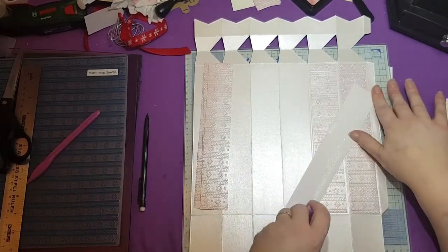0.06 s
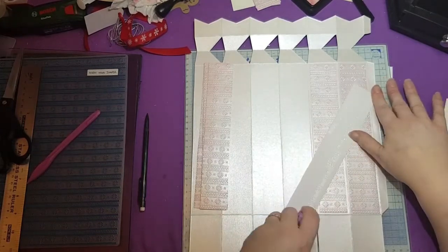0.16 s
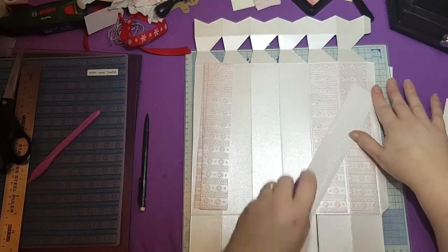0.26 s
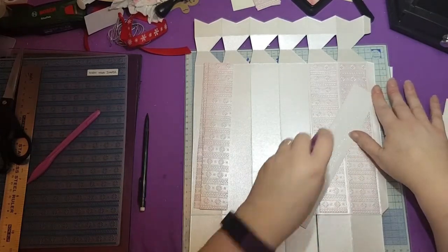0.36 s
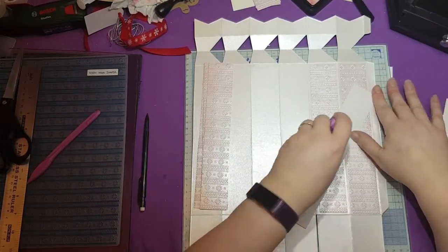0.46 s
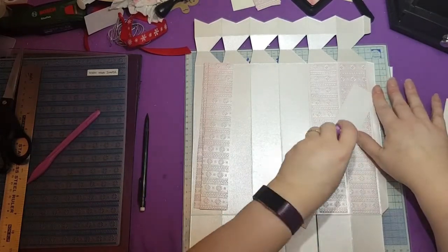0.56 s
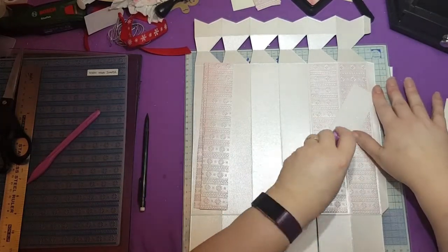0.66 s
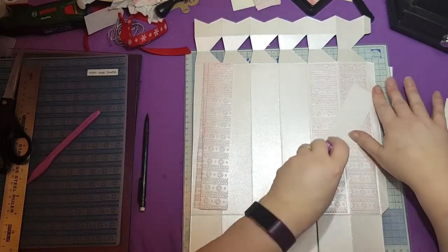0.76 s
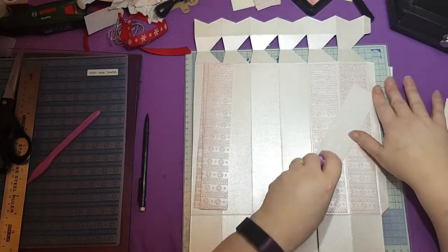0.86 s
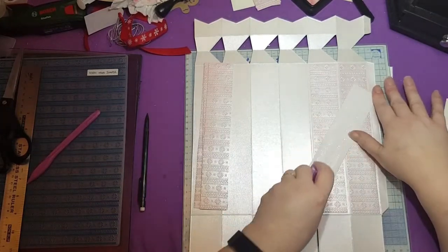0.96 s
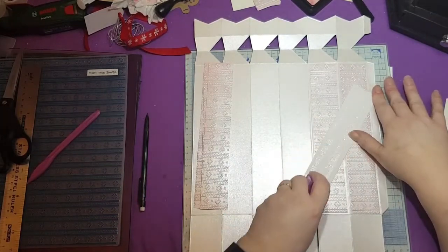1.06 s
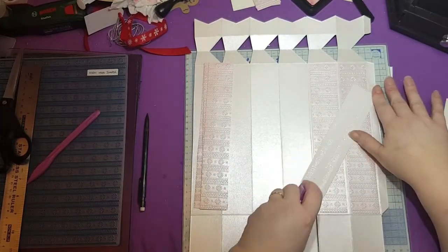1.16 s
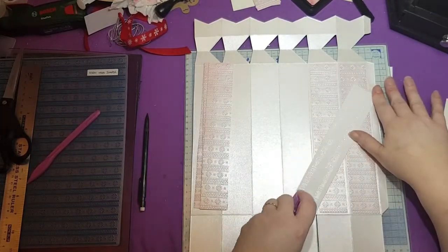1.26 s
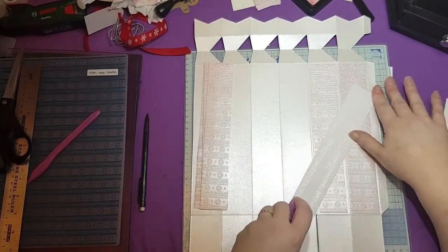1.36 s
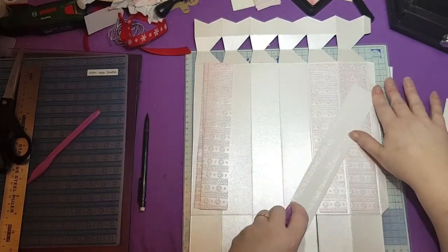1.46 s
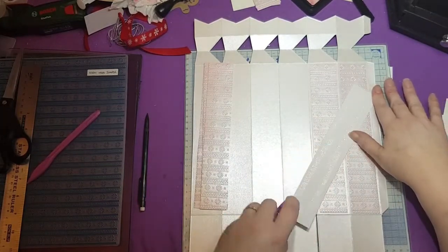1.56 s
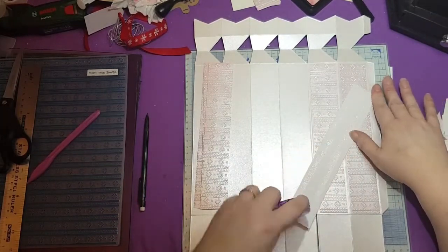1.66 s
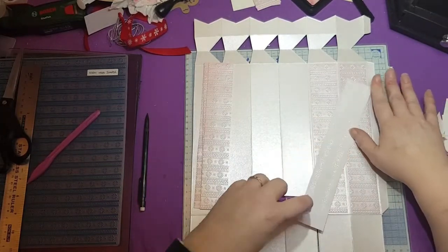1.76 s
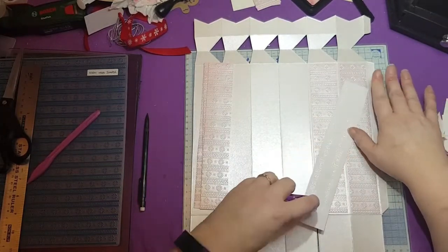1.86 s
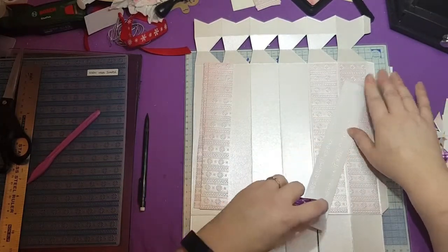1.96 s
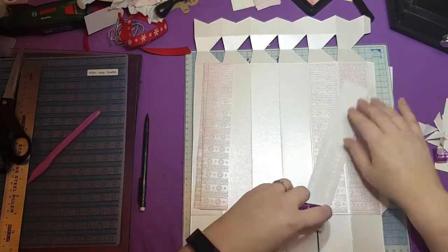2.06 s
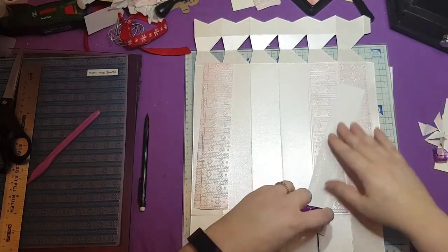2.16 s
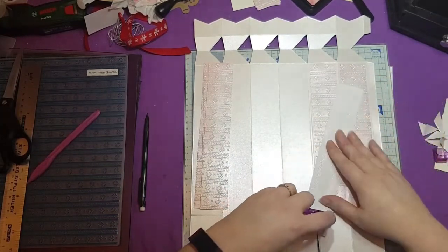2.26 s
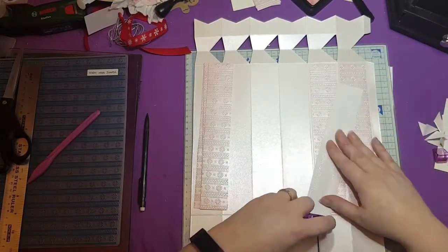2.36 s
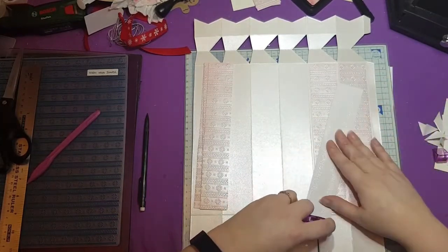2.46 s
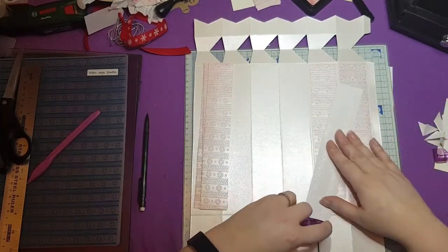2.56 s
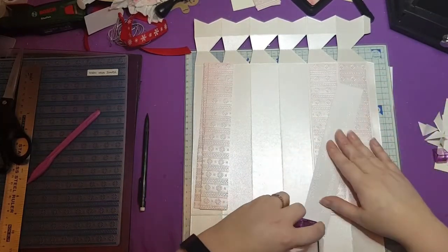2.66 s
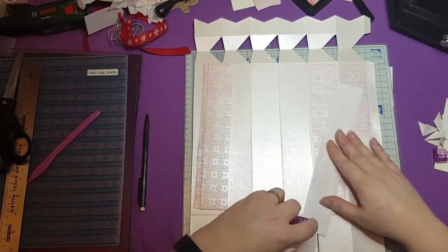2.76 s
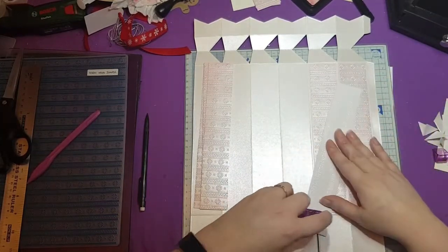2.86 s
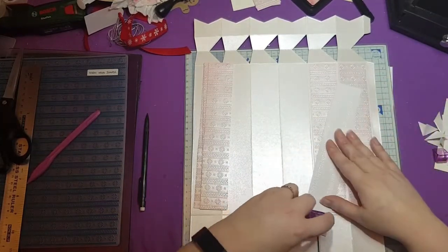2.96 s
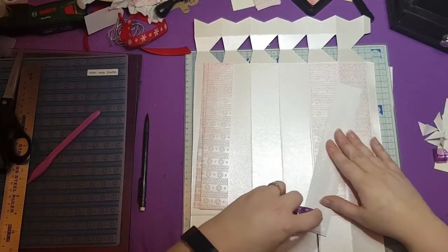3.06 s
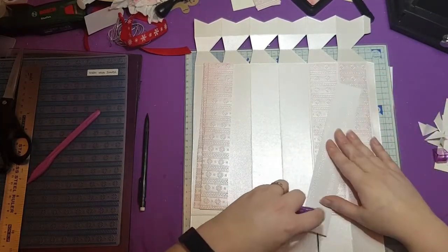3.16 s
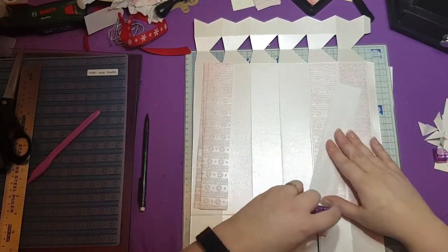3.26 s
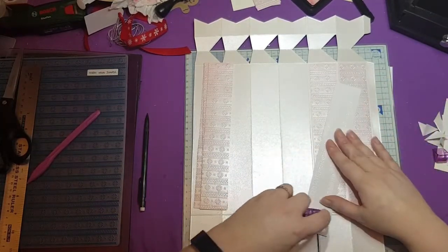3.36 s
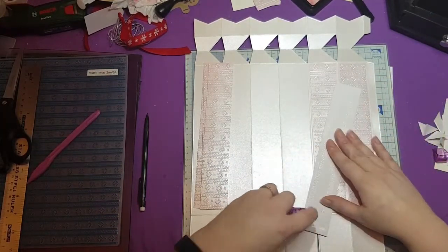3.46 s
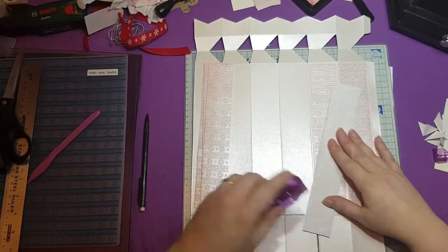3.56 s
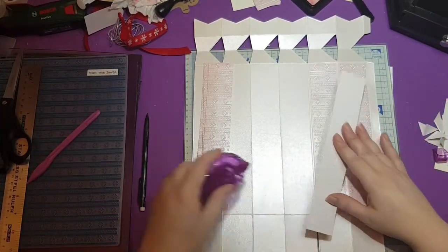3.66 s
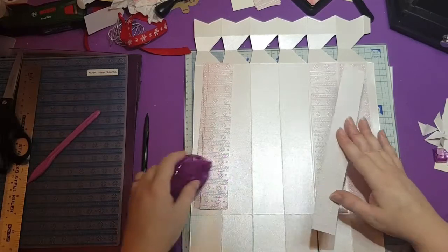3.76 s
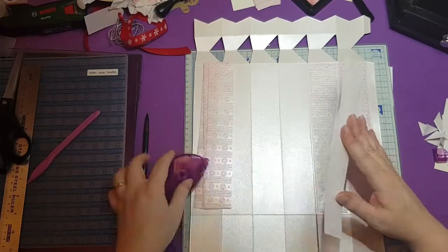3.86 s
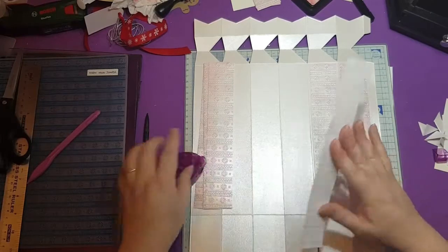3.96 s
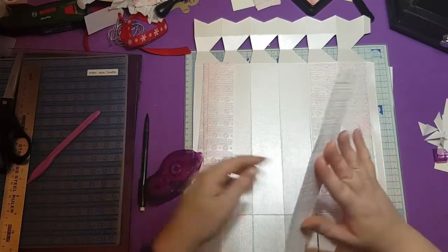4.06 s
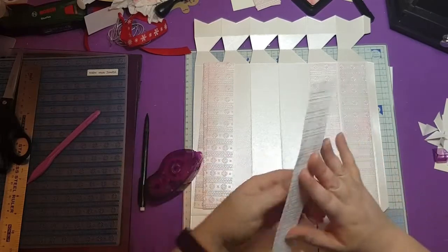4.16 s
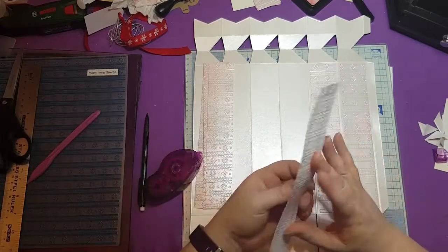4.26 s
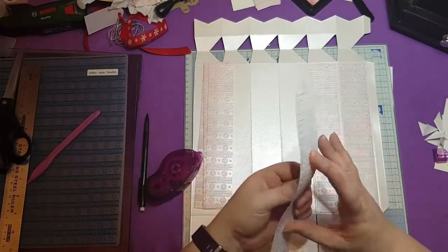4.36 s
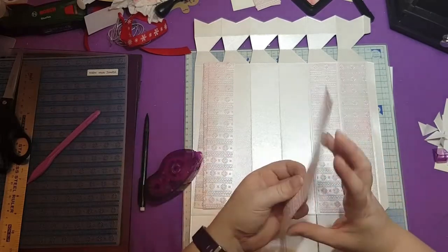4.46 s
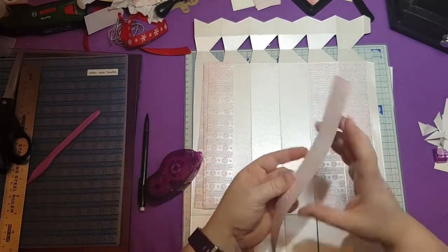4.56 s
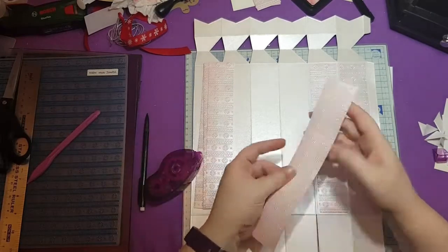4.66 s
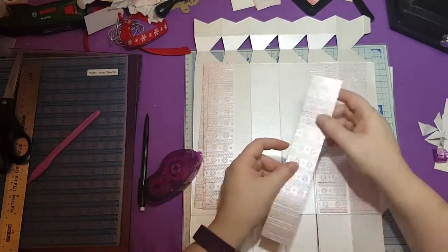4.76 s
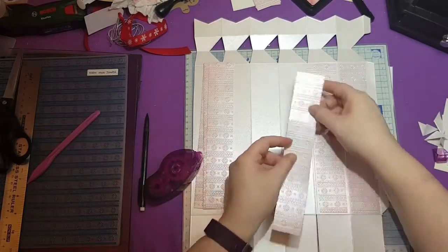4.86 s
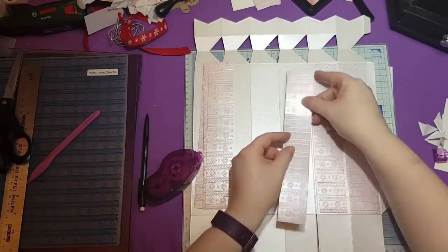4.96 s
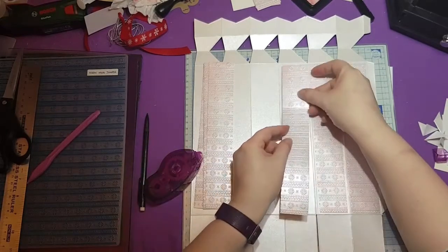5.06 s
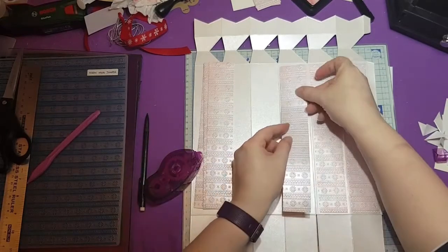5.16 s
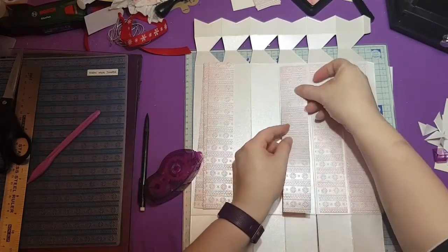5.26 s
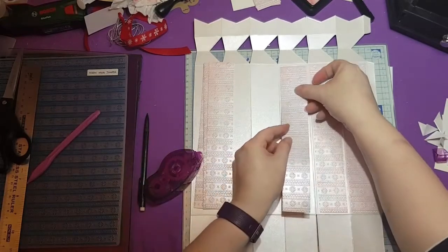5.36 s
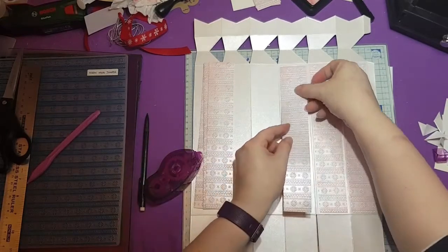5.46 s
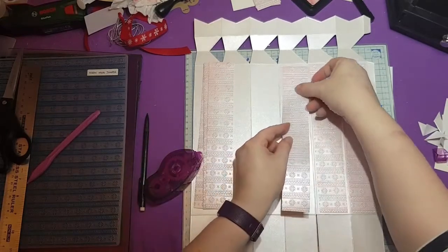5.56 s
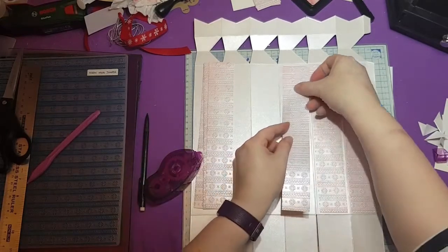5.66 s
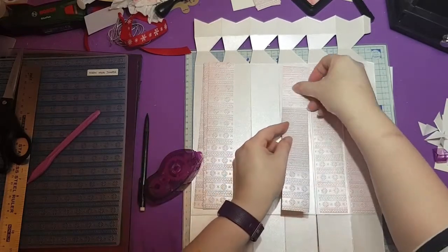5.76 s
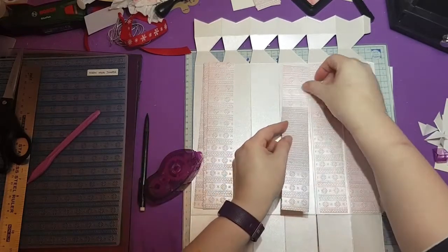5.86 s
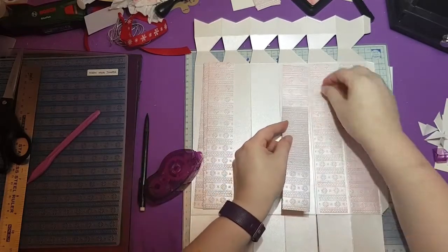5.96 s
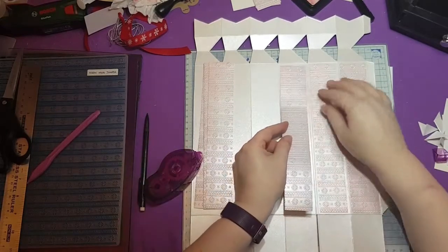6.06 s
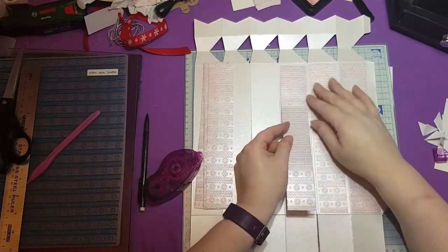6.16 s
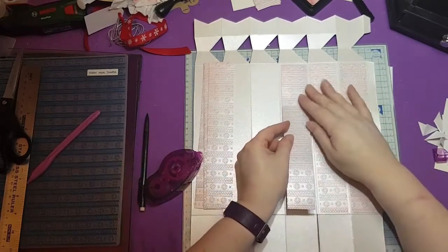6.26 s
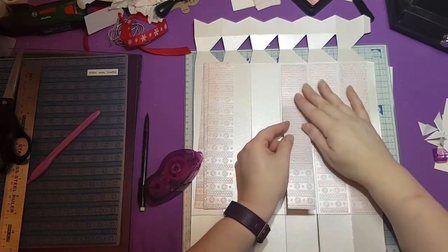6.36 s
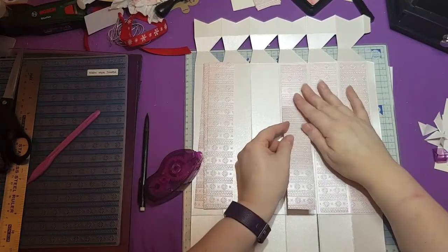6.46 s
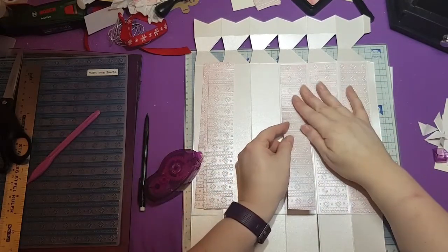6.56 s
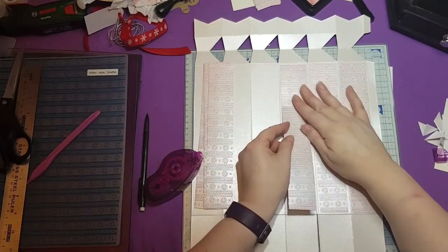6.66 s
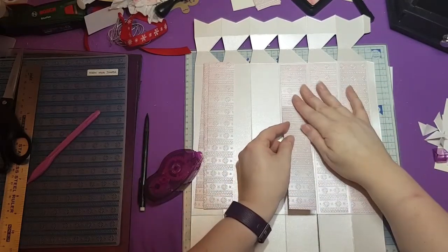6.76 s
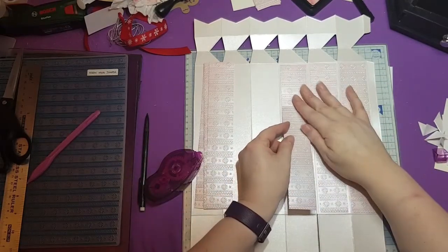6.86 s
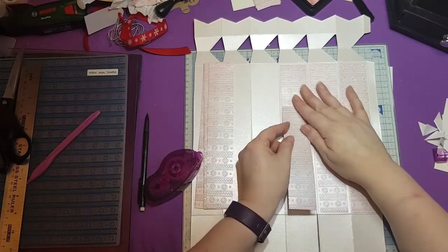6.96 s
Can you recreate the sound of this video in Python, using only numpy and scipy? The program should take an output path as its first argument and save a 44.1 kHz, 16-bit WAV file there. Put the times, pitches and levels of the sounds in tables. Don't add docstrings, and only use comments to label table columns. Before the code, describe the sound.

A plastic tape runner rasps and squeaks in short strokes along card, clacks down on the desk, then a stiff strip snaps and rustles.

```python
import sys
import numpy as np
from scipy import signal
from scipy.fft import rfft, irfft, next_fast_len
from scipy.io import wavfile
from scipy.ndimage import uniform_filter1d, map_coordinates

SR = 44100
rng = np.random.default_rng(int(sys.argv[2]) if len(sys.argv) > 2 else 0)


def gain_from_decibels(decibels):
    exponent = np.asarray(decibels, float) / 20
    return 10 ** exponent


def transcribe(signal):
    frames = np.atleast_2d(signal).T
    limited = np.clip(frames, -1, 1)
    pcm = np.round(limited * 32767).astype(np.int16)
    wavfile.write(sys.argv[1], SR, pcm)


N = 309133
HIT = 4096
TAIL = 20480
PAN_DB = 3.5


# [t/s, length/s, effort level/dB, squeal rel level/dB, hollow rel level/dB]
PUSHES = [(-0.02, 0.086, -53, -1, -6.5), (0.105, .05, -64, -1, -20), (0.17, .045, -65, -10, -14.5),
          (0.748, .03, -62, -9, -4), (0.778, 0.088, -52.5, -2.5, -10.5), (0.891, 0.044, -50, -2, -6.5),
          (0.972, 0.065, -55.5, 0, -8), (1.075, .11, -60, 2, -19.5), (1.224, 0.012, -52, 6.5, -33),
          (1.26, 0.041, -58, -3, -18), (1.336, .07, -65, -4, -10), (1.391, 0.11, -61.5, 5, -25),
          (1.475, 0.11, -66, -5, -14), (2.297, 0.041, -62, -12, -12), (2.338, 0.053, -69, -13, -6),
          (2.438, 0.046, -71.5, -2, -14), (2.725, 0.086, -63.5, -10, -14), (2.812, 0.041, -61, -21, -26),
          (3.11, 0.051, -63.5, -10, -5.5), (3.2, 0.041, -64.5, -15, -9), (3.27, 0.045, -59.5, -21, -22)]
PUSH_RISE_S, PUSH_SAG_DB_PER_S, PUSH_FALL_S = 0.035, 29, 0.076


def effort():
    rows = [(s, PUSH_RISE_S, hold, PUSH_FALL_S, *rest) for s, hold, *rest in PUSHES]
    return swells(rows, PUSH_SAG_DB_PER_S)


# [t/s, f/Hz]
GRIP = [(0, 2425), (.15, 2310), (.8, 2280), (1.03, 2337), (1.3, 2300), (1.48, 2395), (2.4, 2490),
        (2.75, 2410), (3.2, 2510)]
FLUTTER_HZ, UPPER_HZ, UPPER_WANDER_HZ = 45, 3900, 120


def ring_pitches():
    grip_hz = np.interp(np.arange(N) / SR, *np.transpose(GRIP))
    lower_hz = grip_hz + FLUTTER_HZ * wander(30)
    upper_hz = UPPER_HZ + UPPER_WANDER_HZ * wander(8)
    return lower_hz, upper_hz


# [f/Hz, width/Hz, level/dB]
SHELL_BODY = [(922, 150, 5), (1295, 680, -4)]
# [f/Hz, width/Hz, level/dB]
GRATING = [(1590, 2100, -13.5), (2920, 880, -3), (4520, 1110, 4), (6180, 570, 3.5), (7220, 1400, 0),
           (11470, 1800, -1.5), (13800, 1300, -3)]
RING_WIDTHS = (93, 310)
UPPER_DB, FLUTTER_DB = -3.5, 2.5


def strokes(lower_hz, upper_hz):
    push, squeal_db, hollow_db = effort()
    force = grit(spread_db=2.0, clump_db=4.0, rate=170)
    squeal = gain_from_decibels(squeal_db - 1.5 + FLUTTER_DB * wander(39.87)) * follow(force, lower_hz, RING_WIDTHS[0])
    upper_ring = gain_from_decibels(UPPER_DB - 13.5) * follow(force, upper_hz, RING_WIDTHS[1])
    hollow = gain_from_decibels(hollow_db - 4) * unit(resonate(force, SHELL_BODY))
    grate = gain_from_decibels(-0.5) * unit(resonate(force, GRATING))
    return place(push * (squeal + upper_ring + hollow + grate), PAN_DB, lead=6)


# [t/s, crack peak level/dB, body rel level/dB, rings rel level/dB]
TICKS = [(0.1823, -49, -12, -7), (0.7783, -47.5, -19, -15), (1.0465, -38, -21, -6),
         (1.2202, -40.5, -34, -17), (1.4135, -55, -36, 4.5), (2.111, -62, 0.5, -22),
         (2.2945, -44.5, -10.5, -10.5), (2.3378, -35, -8, -11.5), (2.344, -45, 1.5, -21),
         (2.4404, -57, -6, 1), (2.6929, -48, -17, -17), (2.7236, -42, -28, -8.5), (2.7702, -50.5, -1, 3.5),
         (2.8137, -50, -6.5, 6.5), (3.1892, -44, -31, 0), (3.194, -45, -31, -13), (3.302, -45, -31, -14),
         (3.535, -53.5, -13, -8.5)]
STAMPS = [
    (3.0558, -28, -17.5, -17.5),
    (3.387, -22, -11.5, -18.5),
]
TICK_S, TICK_UPPER_DB, TICK_ROOM_DB = 0.011, 7, -1.5


def ticks(lower_hz, upper_hz):
    out = np.zeros((2, N))
    for s, db, body_db, ring_db in TICKS + STAMPS:
        i = round(s * SR)
        lower = [(lower_hz[i], RING_WIDTHS[0], 0)]
        upper = [(upper_hz[i], RING_WIDTHS[1], 0)]
        zones = ((0, GRATING), (body_db, SHELL_BODY), (ring_db, lower), (ring_db + TICK_UPPER_DB, upper))
        add(out, s, knock(db, zones, TICK_S))
    direct, spread = out
    return place(np.array([direct, gain_from_decibels(TICK_ROOM_DB) * spread]), PAN_DB, lead=6)


# [t/s, peak level/dB, f/Hz]
CRACKS = [(0.0611, -33.5, 5700), (0.238, -51, 6000), (0.8903, -29, 11000), (0.9887, -29, 11500),
          (1.008, -30, 9600), (1.0185, -39, 9000), (1.213, -41, 10500), (1.2185, -31.5, 7460),
          (1.279, -39.5, 9000), (1.36, -47, 8200), (1.4822, -33.5, 8800), (2.1674, -42.5, 13000),
          (2.7268, -29, 7540), (2.74, -45, 8000), (2.815, -34, 11000), (3.175, -40, 7500),
          (3.271, -48, 8000), (3.2768, -31.5, 7150), (3.4771, -35.5, 9200)]
CRACK_S, CRACK_WIDTH, CRACK_GRATE_DB, CRACK_ROOM_DB = 0.0038, 0.43, -11.5, -3


def cracks():
    out = np.zeros((2, N))
    for s, db, hz in CRACKS:
        zones = ((0, [(hz, CRACK_WIDTH * hz, 0)]), (CRACK_GRATE_DB, GRATING))
        add(out, s, knock(db, zones, CRACK_S))
    direct, spread = out
    return place(np.array([direct, gain_from_decibels(CRACK_ROOM_DB) * spread]), PAN_DB, lead=6)


# [t/s, peak level/dB, low rel level/dB, contact/s, pan/dB]
CLACKS = [
    (3.8776, -27, -16.5, 0.015, 2),
    (4.0053, -5.5, -8, 0.0025, 1),
]
ROCK = [
    (3.9583, -11.5, -9.5, 0.0021, 2.86),
]
# [f/Hz, width/Hz, level/dB]
CLACK_LOW = [(574, 78, -6), (728.5, 26, -0.5), (870, 67, -9), (1082.6, 51, -3.5), (1220, 100, -4),
             (1800, 57, -6.5)]
CLACK_MID = [(2540, 400, -3), (2610, 160, 2), (2910, 140, -4.5), (3780, 77, -4), (3820, 760, -2.5),
             (4200, 330, 0)]
CLACK_TOP = [(5500, 470, -5), (6450, 140, -2), (7300, 620, -7), (7700, 820, -3.5), (9900, 830, -12.5),
             (12900, 2100, -16.5)]
EDGE = [(2380, 150, -7.5), (3099, 120, -11), (3450, 86, -11), (3900, 80, 1.5), (4620, 220, -13)]
CLACK_TOP_DB = -6


def clacks():
    out = np.zeros((2, 2, N))
    for rows, modes in ((CLACKS, CLACK_MID), (ROCK, EDGE)):
        for s, db, low_db, contact, pan_db in rows:
            zones = ((0, modes), (low_db + 1, CLACK_LOW), (CLACK_TOP_DB, CLACK_TOP))
            add(out, s + 0.00082, place(knock(db + 0.1, zones, contact), pan_db, lead=0))
    return out


# [t/s, peak level/dB, f/Hz, flap rel level/dB, bright rel level/dB]
SNAPS = [(0.6143, -49.5, 3800, -6, -14), (1.836, -45, 4000, -27, -7.5), (1.8557, -47.5, 3960, -20, -9),
         (3.58, -52, 5770, -28, -10), (3.724, -42.5, 3350, -45, -0.5), (4.3487, -19.5, 2970, -23, -44),
         (4.355, -42, 3938, -31.5, -16), (4.5443, -22, 2860, -41, -26), (4.548, -25.5, 2350, -35, -8.5),
         (4.5693, -31.5, 2280, -32, -19), (4.6583, -32.5, 2660, -29, -8.5), (5.0642, -45, 2770, -18, -27),
         (5.218, -46, 4360, -19.5, -23.5), (5.627, -49.5, 4000, -29.5, -13),
         (5.7744, -53.5, 4160, -8.5, -13), (5.8285, -41.5, 4300, -20, -21),
         (5.8457, -29.5, 2630, -25.5, -36), (5.8474, -34.5, 1650, -34, -34), (5.8518, -42, 4400, -15, -20)]
# [f/Hz, width/Hz, level/dB]
FLAP = [(404, 78, 13.5), (740, 240, 0.5), (1250, 180, -4)]
# [f/Hz, width/Hz, level/dB]
CARD = [(2020, 1400, -15.5), (4000, 3400, -9), (6700, 2100, -9), (10974, 12000, -28.5)]
SNAP_S = 0.0075


def snaps():
    out = np.zeros((2, N))
    for s, db, hz, flap_db, bright_db in SNAPS:
        panel = [(hz, 0.074 * hz, 0)] + CARD[:2]
        add(out, s, knock(db, ((0, panel), (flap_db, FLAP), (bright_db, CARD[2:])), SNAP_S))
    return place(out, PAN_DB, lead=5)


# [loudest t/s, rise/s, fall/s, level/dB, colour f/Hz]
SLIDES = [(0.64, .03, 0.15, -62.5, 3900), (1.76, 0.081, 0.12, -65, 4950), (1.862, 0.089, .09, -66, 4240),
          (2.2, .06, .12, -73.5, 5580), (3.56, .1, 0.5, -73.5, 5050), (3.726, 0.0074, .13, -76, 4300),
          (3.868, .05, 0.0081, -67.5, 5070), (4.337, 0.056, .015, -50.5, 3920),
          (4.535, 0.054, .02, -47.5, 3770), (4.49, 0.08, .1, -62, 3600), (4.569, 0.027, 0.103, -52.5, 2650),
          (4.662, 0.0091, 0.2, -55.5, 3770), (4.94, 0.033, 0.14, -67.5, 2400),
          (5.009, 0.094, 0.029, -65.5, 2190), (5.07, .01, 0.18, -62.5, 2900),
          (5.225, 0.01, 0.16, -62, 4100), (5.649, .04, 0.074, -62, 4200), (5.836, 0.11, 0.028, -61.5, 3400),
          (5.871, .02, .13, -58.5, 2803), (5.939, 0.058, 0.066, -61.5, 4200), (6.16, .06, .15, -67.5, 4135),
          (6.285, .04, 0.11, -69.5, 4300)]
# [loudest t/s, rise/s, fall/s, level/dB]
WOBBLES = [
    (4.569, 0.027, 0.041, -56),
    (4.719, 0.19, 0.066, -64.5),
    (4.92, .02, 0.056, -76.5),
]
FLAP_DB = -22.5
SLIDE_ROUND = 1.5


def rustle():
    slide, colour_hz = swells([(s, rise, 0, *rest) for s, rise, *rest in SLIDES], bend=SLIDE_ROUND)
    wobble, = swells([(s, rise, 0, *rest) for s, rise, *rest in WOBBLES], bend=SLIDE_ROUND)
    force = grit(spread_db=1.5, clump_db=3.5, rate=74)
    sheet = gain_from_decibels(-2) * unit(resonate(force, CARD)) + gain_from_decibels(-2.5) * follow(force, colour_hz, width_hz=660)
    flap = (gain_from_decibels(FLAP_DB) * slide + wobble) * unit(resonate(force, FLAP[1:]))
    return place(gain_from_decibels(-1.0) * slide * sheet + flap, PAN_DB, lead=5)


# [t/s, peak level/dB, boom f/Hz, knock rel level/dB]
THUMPS = [
    (0.614, -46, 110.6, -11),
    (0.653, -48, 118, -15),
    (2.337, -53, 98, -38),
    (3.057, -38.5, 97, -15),
    (3.108, -41.5, 119.7, -25),
    (3.385, -35, 99.4, -3.5),
    (3.438, -40, 133, -26),
    (3.878, -35, 117.4, 1),
    (3.958, -43, 104, 0),
    (4.005, -32, 118, 10.5),
]
# [f/Hz, width/Hz, level/dB]
DESK_LOW = [(68, 23, -4.5), (104.3, 38.6, -0.5), (131, 45.4, -4)]
DESK_HIGH = [(192.5, 7.9, 0), (226.4, 8, -8), (263, 52, -1), (370, 110, -3.5), (482, 160, -4.5)]
BOOM_T60_S = 0.14
SHAKE_DB, TYPICAL_DB, SHAKE_FOLLOWS = -71.5, -60, 0.42


def desk():
    push = effort()[0]
    shake = gain_from_decibels(SHAKE_DB) * (push / gain_from_decibels(TYPICAL_DB)) ** SHAKE_FOLLOWS
    out = shake * unit(resonate(rng.standard_normal(N), DESK_LOW))
    t = np.arange(TAIL) / SR
    for s, db, hz, knock_db in THUMPS:
        swell = gain_from_decibels(db - 60 * t / BOOM_T60_S) * (1 - np.exp(-t / .004))
        add(out, s, swell * np.sin(2 * np.pi * hz * t))
        add(out, s, knock(db, [(knock_db, DESK_HIGH)], 0.0037)[0])
    return place(out, pan_db=.8, lead=0)


# [f/Hz, t60/s]
ROOM = [(100, 0.26), (500, 0.29), (2000, 0.23), (6000, 0.23), (14000, 0.2)]
# [f/Hz, likeness 0-1]
ROOM_ALIKE = [(60, 1), (200, 0.44), (500, 0.4), (1200, .1)]
BLOCK = 4096


def room(x):
    out = np.zeros((2, N))
    starts = range(0, N, BLOCK)
    hz, t, z = signal.stft(rng.standard_normal((len(starts), 2, TAIL)), SR, nperseg=256)
    alike = np.clip(along(ROOM_ALIKE, hz), 0, 1)[:, None]
    z[:, 1] = alike * z[:, 0] + np.sqrt(1 - alike ** 2) * z[:, 1]
    decay = gain_from_decibels(-60 * t / along(ROOM, hz)[:, None])
    tails = signal.istft(z * decay, SR, nperseg=256)[1]
    tails *= 1 - np.exp(-np.arange(tails.shape[-1]) / SR / 0.0012)
    for start, tail in zip(starts, tails):
        stretch = x[:, start:start + BLOCK]
        add(out, start / SR, signal.fftconvolve(stretch, tail / np.linalg.norm(tail[0]), axes=1))
    return out


# [f/Hz, level/dB per Hz]
RUMBLE = [(12, -47.5), (25, -21), (80, -3), (122, -1), (160, -9.5), (240, -21), (450, -21.5), (800, -44.5)]
# [f/Hz, level/dB per Hz]
HISS = [(290, -26), (500, -3.5), (900, -5.5), (1500, -7), (4300, -7), (7580, -11), (14000, -7), (15000, -9)]
# [f/Hz, side over mid level/dB]
WIDE = [(60, -5), (180, -7.5), (550, -2), (1640, 0), (4950, -0.5), (14900, 0.5)]
RUMBLE_DB, HISS_DB = -69.5, -76.5


def air():
    hz = np.fft.rfftfreq(N, 1 / SR)
    out = np.zeros((2, N))
    for spectrum, db in ((RUMBLE, RUMBLE_DB), (HISS, HISS_DB)):
        gains = gain_from_decibels(along(spectrum, hz) + np.outer([0, 1], along(WIDE, hz)))
        mid, side = irfft(rfft(rng.standard_normal((2, N))) * gains, N)
        out += gain_from_decibels(db) * np.array([mid + side, mid - side]) / mid.std()
    return out


def knock(db, zones, contact):
    t = np.arange(HIT) / SR
    rise = 1 - np.exp(-t / .0002)
    force = rfft(gain_from_decibels(-60 * t / np.clip(contact, .001, .2)) * rise * rng.standard_normal(HIT))
    force = force / uniform_filter1d(np.abs(force), size=48)
    force = irfft(force, HIT) * (t < t[HIT // 2])
    out = np.zeros((2, HIT))
    for rel_db, modes in zones:
        direct = resonate(force, modes)
        spread = radiated(modes, widen=0.86)
        spread *= np.linalg.norm(direct) / np.linalg.norm(spread)
        out += gain_from_decibels(db + rel_db) * np.array([direct, spread]) / np.abs(direct).max()
    return out


def radiated(modes, widen):
    f = np.fft.rfftfreq(HIT, 1 / SR)
    power = sum(gain_from_decibels(2 * db) / (1 + ((c * c - f * f) / (widen * w * (f + 1))) ** 2) for c, w, db in modes)
    return np.roll(irfft(np.sqrt(power), HIT), 128) * (np.arange(HIT) < HIT // 2)


def resonate(x, modes):
    n = x.shape[-1]
    m = next_fast_len(n + HIT)
    f = np.fft.rfftfreq(m, 1 / SR)
    gain = 0
    for k, (c, w, db) in enumerate(modes):
        gain = gain + (-1) ** k * gain_from_decibels(db) * 1j * f * w / (c * c - f * f + 1j * f * w)
    return irfft(rfft(x, m) * gain, m)[..., :n]


def follow(force, hz, width_hz):
    spin = np.exp(2j * np.pi * np.cumsum(hz) / SR)
    held = force / spin
    for w in (width_hz, 4 * width_hz):
        held = signal.lfilter([1], [1, -np.exp(-np.pi * w / SR)], held)
    return unit((held * spin).real)


def grit(spread_db, clump_db, rate):
    sizes = np.clip(rng.standard_normal(N), -2, 2)
    return rng.standard_normal(N) * gain_from_decibels(spread_db * sizes + clump_db * wander(rate))


def swells(rows, sag_db=0, bend=1):
    t = np.arange(0, N / SR + .001, .001)
    s, rise, hold, fall, db, *traits = np.array(rows).T[..., None]
    late = t - s
    drop = (np.maximum(-late / rise, 0) + np.maximum((late - hold) / fall, 0)) ** bend
    level_db = db - sag_db * np.clip(late, 0, hold) - 25 * drop
    level_db = np.maximum(level_db, -200)
    vote = gain_from_decibels(8 * (level_db - level_db.max(0)))
    gain = np.sqrt(gain_from_decibels(2 * level_db).sum(0))
    curves = [gain] + [(vote * c).sum(0) / vote.sum(0) for c in traits]
    return [np.interp(np.arange(N) / SR, t, v) for v in curves]


def wander(rate):
    return map_coordinates(rng.standard_normal(size=4096), [np.arange(N) * rate / SR])


def place(x, pan_db, lead):
    return np.stack([gain_from_decibels(pan_db / 2) * x, gain_from_decibels(-pan_db / 2) * np.roll(x, lead, axis=-1)], axis=-2)


def add(track, s, sound):
    part = track[..., round(s * SR):][..., :sound.shape[-1]]
    part += sound[..., :part.shape[-1]]


def unit(x):
    return x / np.sqrt(np.mean(x ** 2) + 1e-20)


def along(points, hz):
    f, v = np.transpose(points)
    return np.interp(np.log(hz + 1), np.log(f + 1), v)


# [f/Hz, width/Hz, level taken off/dB]
HOUSING = [(9100, 2000, -6.5)]


def scene():
    pitches = ring_pitches()
    direct, spread = strokes(*pitches) + ticks(*pitches) + cracks() + clacks() + snaps() + rustle()
    boom = desk()
    work = direct + boom + gain_from_decibels(-1.5) * room(spread + gain_from_decibels(2.5) * boom)
    return work - resonate(work, HOUSING) + air()


def roll_off(x):
    return signal.sosfilt(signal.butter(12, 15520, fs=SR, output="sos"), x)


def record(dry):
    dull = signal.ellip(9, .5, 39, 14560, fs=SR, output="sos")
    return roll_off(signal.sosfilt(dull, dry))


dry = scene()
out = record(dry)
transcribe(out)
```